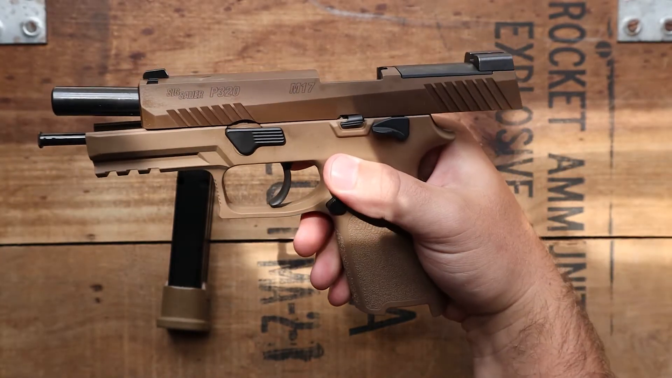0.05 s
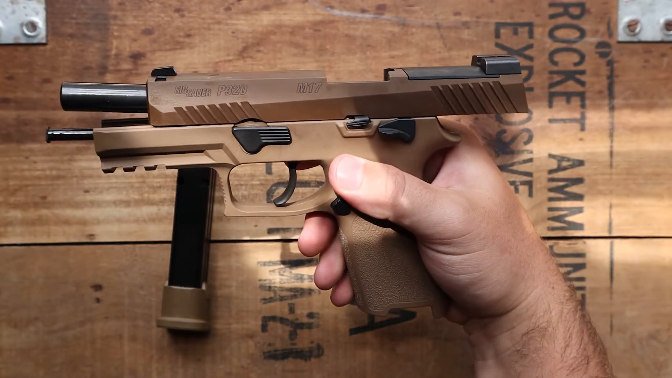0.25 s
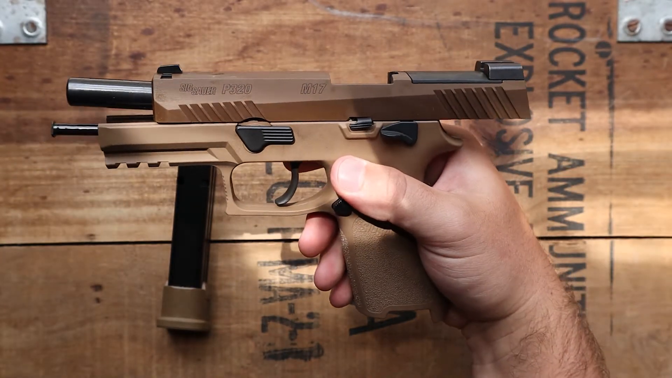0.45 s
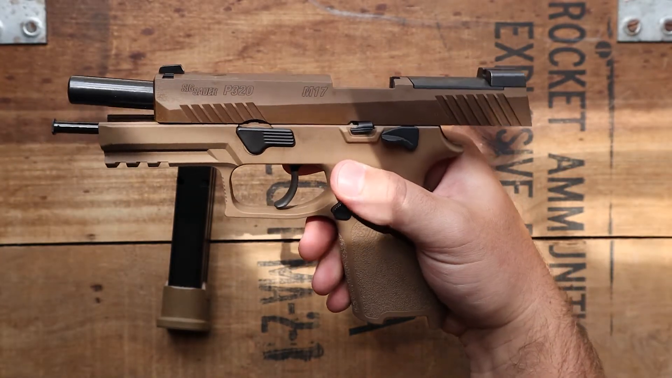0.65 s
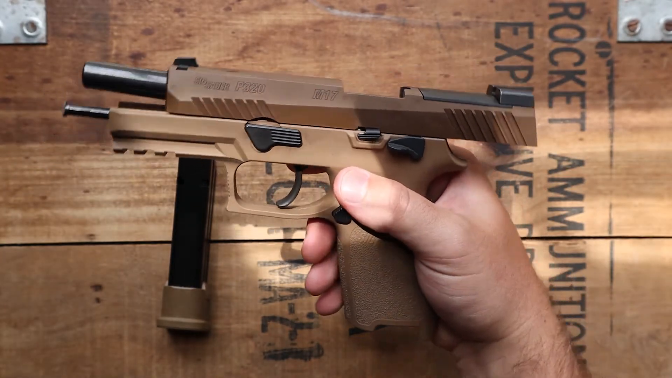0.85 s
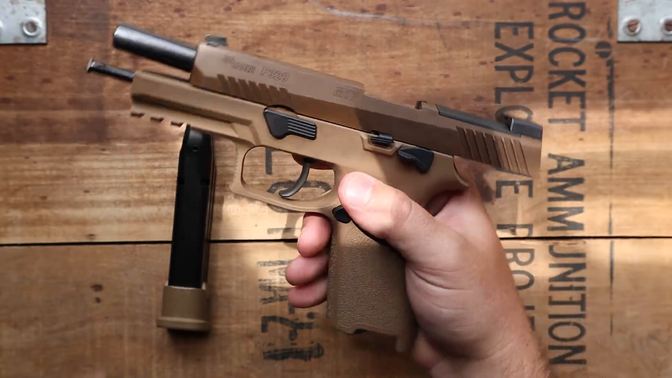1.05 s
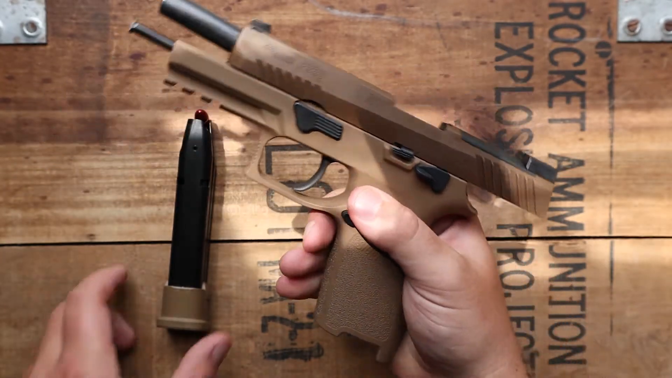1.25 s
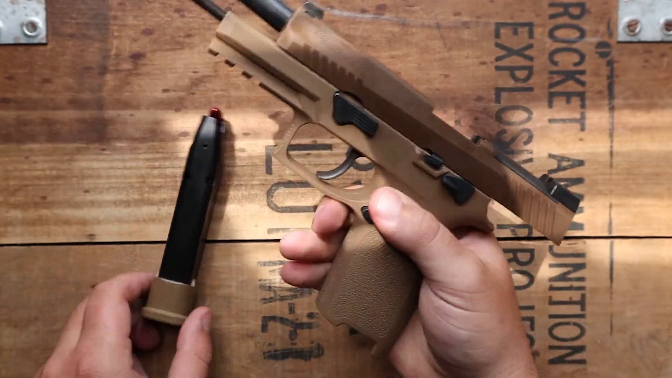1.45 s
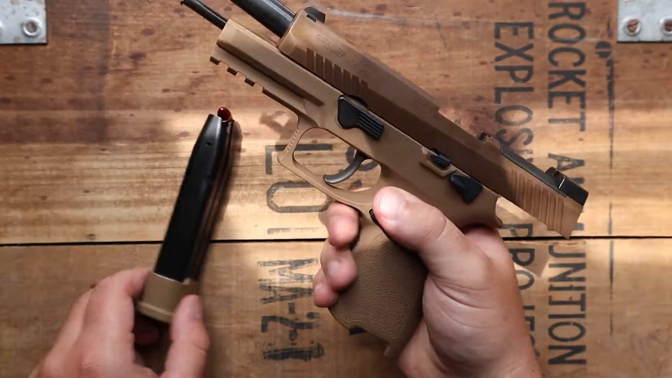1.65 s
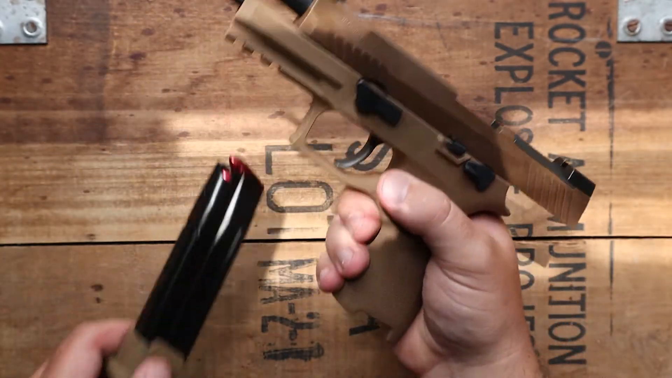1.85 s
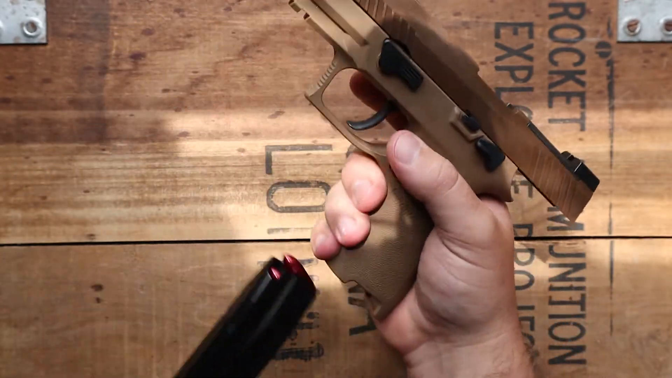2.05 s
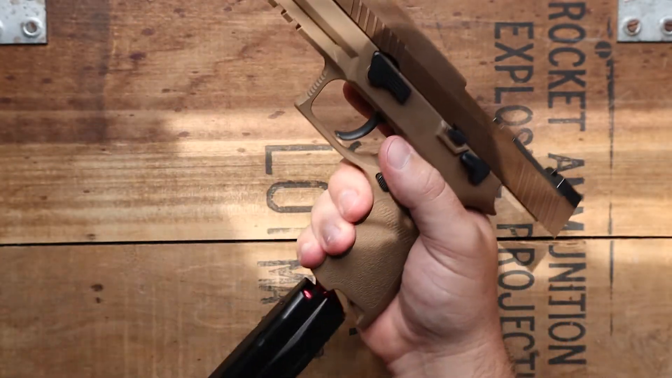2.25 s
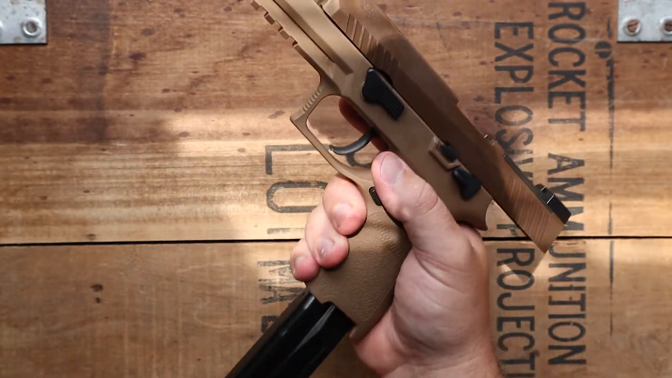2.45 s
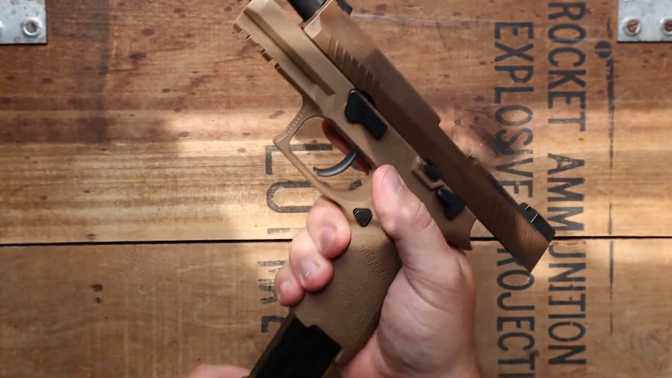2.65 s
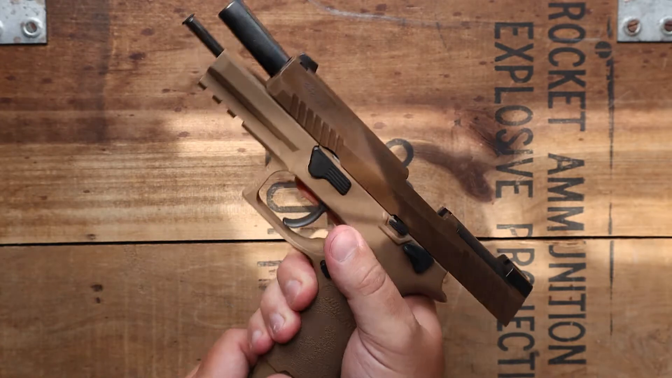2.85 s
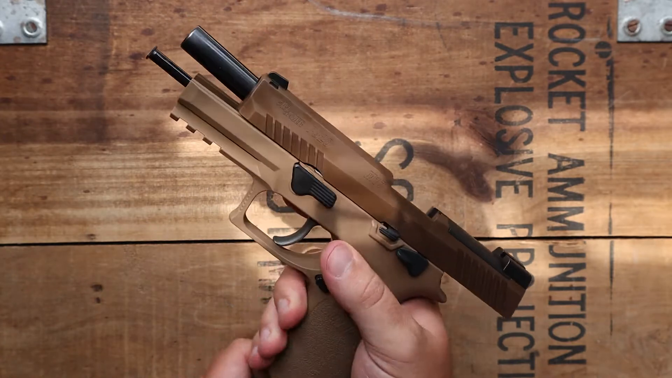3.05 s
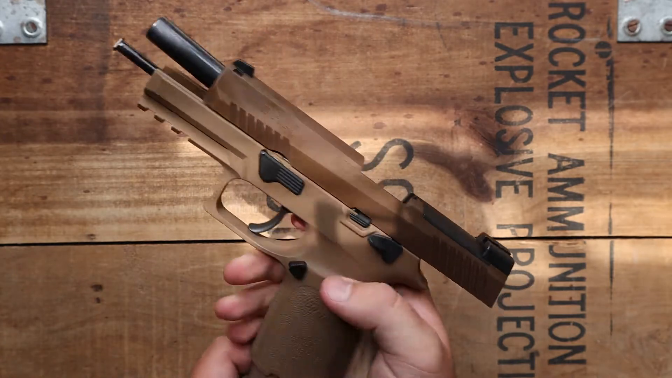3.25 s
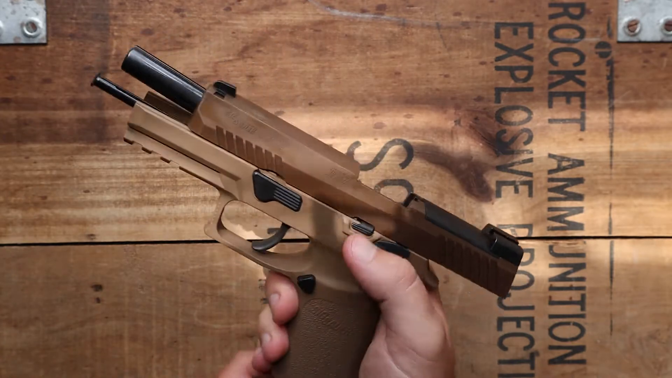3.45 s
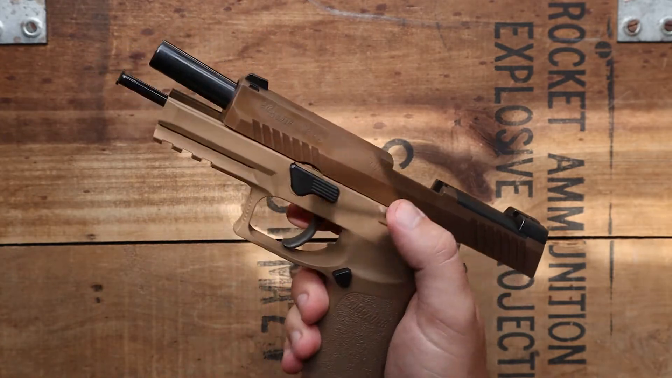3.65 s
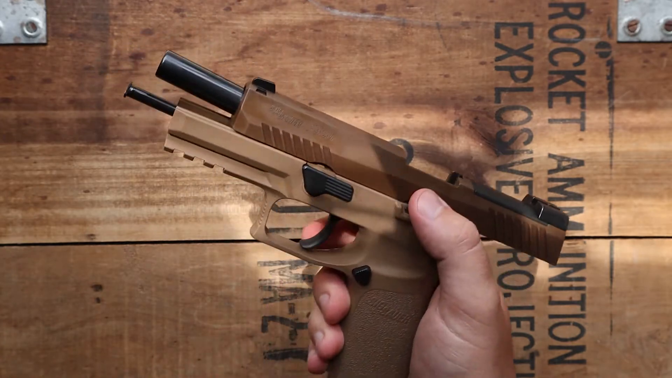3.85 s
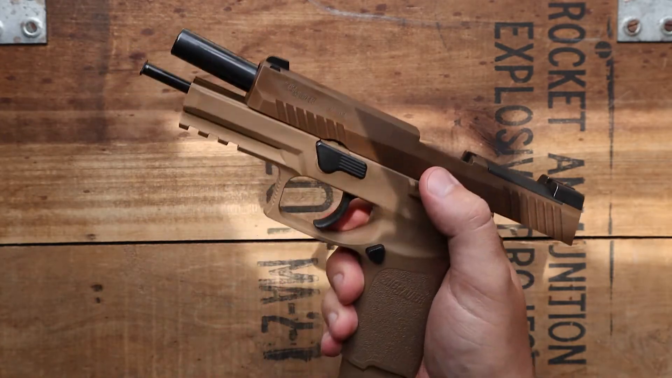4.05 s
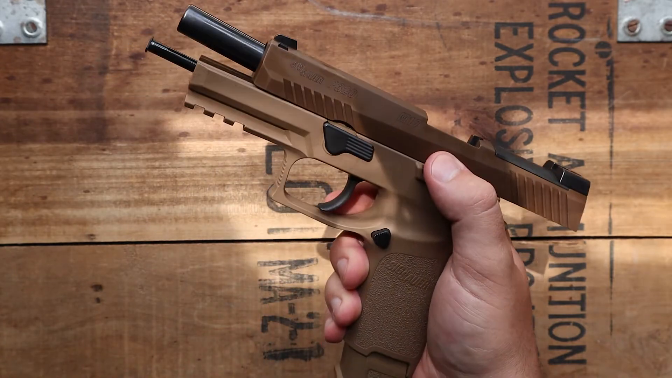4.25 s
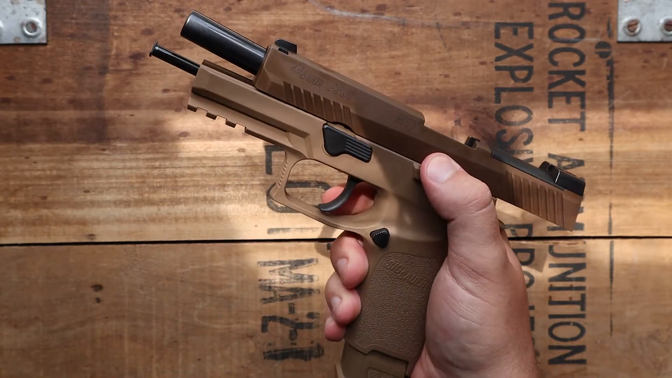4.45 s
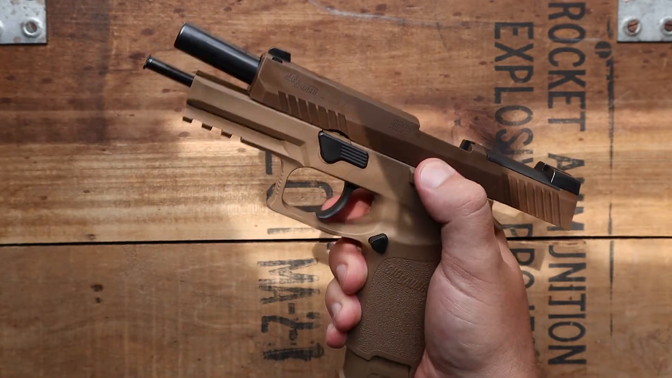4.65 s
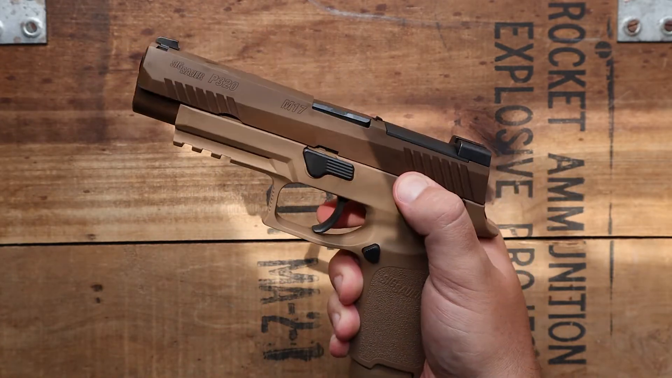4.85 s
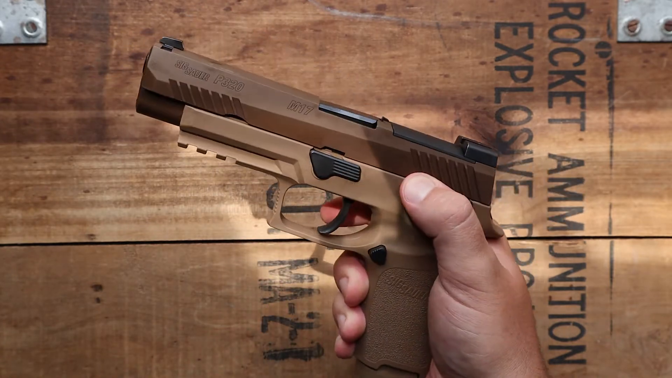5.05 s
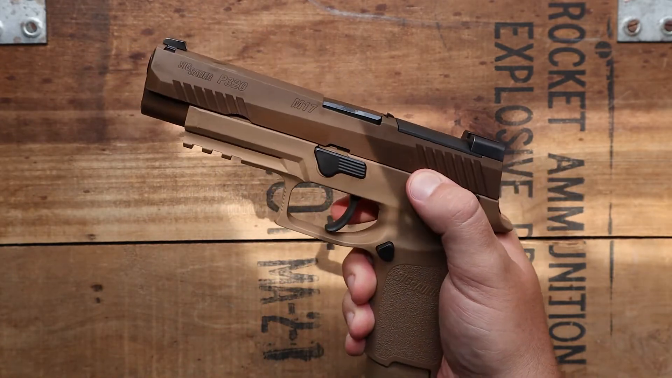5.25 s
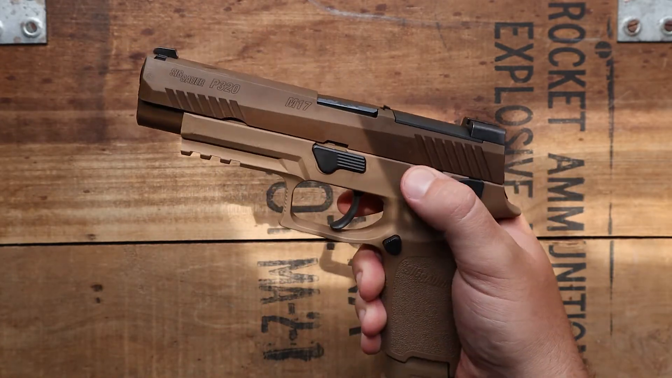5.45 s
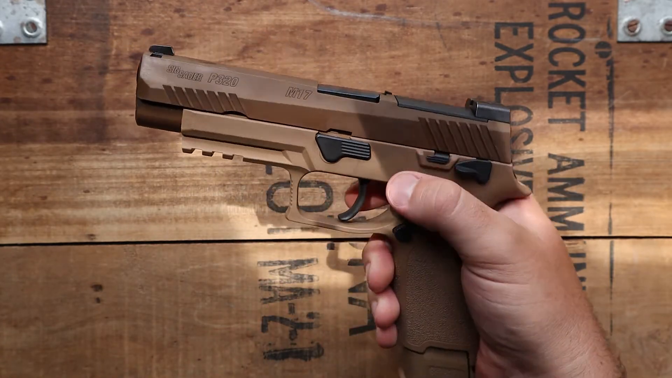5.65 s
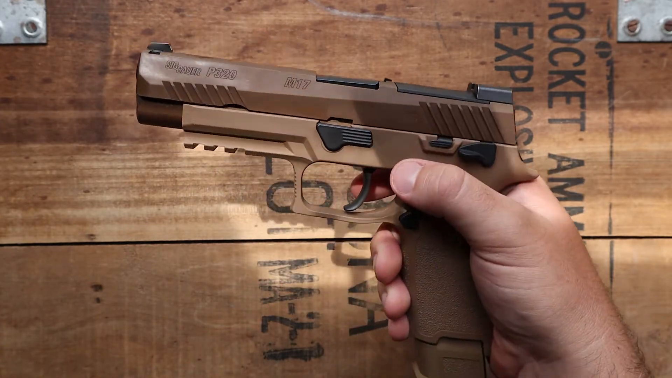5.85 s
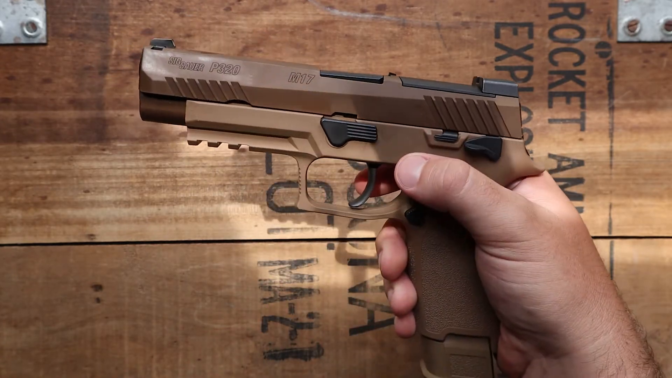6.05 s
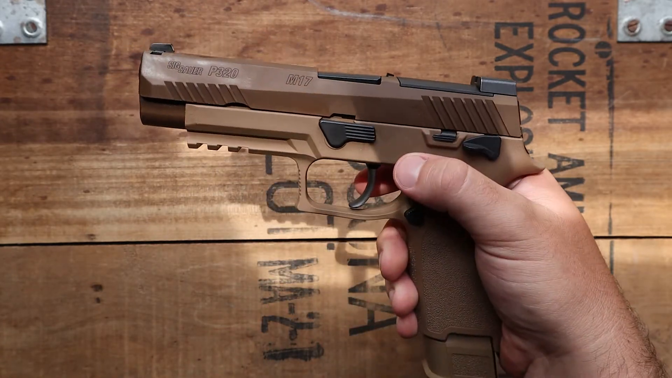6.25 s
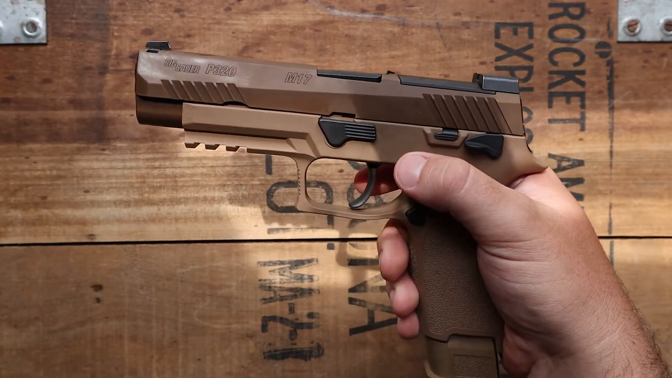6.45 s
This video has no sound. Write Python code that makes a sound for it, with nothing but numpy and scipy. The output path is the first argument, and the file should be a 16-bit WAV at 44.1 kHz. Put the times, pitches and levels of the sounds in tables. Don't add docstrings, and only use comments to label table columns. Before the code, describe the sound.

Very close in a small hard room with faint steady hiss, a hand shifts quietly on a pistol grip. A magazine knocks hollow wooden boards as it is picked up, ticks against the grip, scrapes upward and latches with a loud metallic clack. Small lever clicks follow, then a pause, and the slide slams forward with a bright crack, a brief rattle and a thin fading ring.

```python
import sys
import numpy as np
from scipy import signal
from scipy.fft import rfft, irfft
from scipy.io import wavfile
from scipy.ndimage import uniform_filter1d, minimum_filter1d

SR = 44100
rng = np.random.default_rng(int(sys.argv[2]) if len(sys.argv) > 2 else 0)


def decibels_to_gain(level_db):
    exponent = np.asarray(level_db, float) / 20
    return 10 ** exponent


def output_pcm(signal):
    pcm = np.clip(np.atleast_2d(signal).T, -1, 1) * 32767
    wavfile.write(sys.argv[1], SR, np.round(pcm).astype(np.int16))


N = 286723


def colour(x, points):
    hz, db = np.transpose(points)
    f = np.fft.rfftfreq(len(x), 1 / SR) + 1
    y = irfft(rfft(x) * decibels_to_gain(np.interp(np.log(f), np.log(hz), db)), len(x))
    return y / np.sqrt(np.mean(y ** 2))


def decay(t, t60):
    return 1000. ** (-t / t60)


def ring(push, modes):
    t = np.arange(len(push)) / SR
    body = sum(decibels_to_gain(db) * np.sin(2 * np.pi * hz * t) * decay(t, max(t60, .003)) for hz, db, t60 in modes)
    return signal.fftconvolve(push, body)[:len(t)]


def add(out, s, x, peak_db):
    i = int(s * SR)
    x = x[:N - i]
    out[i:i + len(x)] += x * decibels_to_gain(peak_db) / np.max(np.abs(x))


def walk(rate):
    k = int(SR / rate)
    held = np.repeat(rng.standard_normal(N // k + 1), k)
    return 1.2 * uniform_filter1d(held, k)[:N]


def air():
    # frequency in Hz, density in dB per Hz
    hiss_points = [(60, -49.5), (193, -30), (515, -7), (732, -5.5), (1250, -6), (4120, -18), (10000, -25),
                   (15500, -22.5)]
    # frequency in Hz, width in Hz, level in dB
    duct_mode = (683, 23, -73.5)
    hz, width, db = duct_mode
    duct_points = [(hz - 3 * width, -60), (hz - width / 2, -3), (hz, 0),
                   (hz + width / 2, -3), (hz + 3 * width, -60)]
    duct = colour(rng.standard_normal(N), duct_points)
    hiss = colour(rng.standard_normal(N), hiss_points)
    return decibels_to_gain(-62.5 + .3 * walk(3)) * hiss + decibels_to_gain(db + 0.82 * walk(1.6)) * duct


def room(x):
    # band centre in Hz, level in dB
    bands = [(450, -24), (900, -0.5), (1600, 3.5), (2600, 2.5), (4200, 2), (7000, 3), (11000, -2),
             (14800, -3.5)]
    band_t60 = [.15, .31, .39, .39, .385, .37, .32, .29]
    onset_s = 0.0065
    t, reply = np.arange(SR // 2) / SR, 0
    for (hz, db), t60 in zip(bands, band_t60):
        edges = [(hz / 1.6, -30), (hz / 1.2, 0), (hz * 1.2, 0), (hz * 1.6, -30)]
        band = colour(rng.standard_normal(len(t)), edges)
        reply = reply + decibels_to_gain(db) * np.sqrt(hz) * band * decay(t, t60)
    reply = reply * np.clip(t / onset_s, 0, 1) ** 2
    return signal.fftconvolve(x, reply / np.sqrt(np.sum(reply ** 2)))[:N]


def friction(low_points, grain_db, patchy_db):
    # frequency in Hz, density in dB per Hz
    high_points = [(2500, -28), (4500, 0.5), (7500, 5.5), (10000, -3), (15000, -7)]
    size_db = grain_db * np.minimum(rng.exponential(size=N), 3.5)
    slips = rng.standard_normal(N) * decibels_to_gain(size_db)
    return decibels_to_gain(patchy_db * walk(90)) * [colour(slips, high_points), colour(slips, low_points)]


def rubs():
    # peak in seconds, rise in seconds, fall in seconds, level above 3.5 kHz in dB,
    # lower part relative to it in dB
    shifts = [
        (.158, 0.011, 0.041, -62, -10),
        (.8, 0.13, 0.058, -67.5, -4),
        (1.486, 0.047, 0.094, -61, 3.5),
        (1.745, 0.036, 0.052, -64, 4),
        (3.275, .06, 0.073, -66, -1.5),
        (3.55, 0.039, .06, -62.5, 7),
        (4.101, .05, 0.032, -64.5, -14),
        (6.335, .07, 0.066, -71, -7),
    ]
    # frequency in Hz, density in dB per Hz
    low_points = [(500, -6), (900, 14), (2500, 20.5), (3500, 11), (5000, -32)]
    fade_db = 16.5
    t = np.arange(N) / SR
    high, low = friction(low_points, grain_db=3.5, patchy_db=2.0)
    out = np.zeros(N)
    for s, rise, fall, db, low_db in shifts:
        away = np.maximum((s - t) / rise, (t - s) / fall)
        out += decibels_to_gain(db - fade_db * away ** 1.4) * (high + decibels_to_gain(low_db) * low)
    return out


def crate():
    # start in seconds, peak in dB, brightness in dB per octave,
    # boom of the lowest boards in dB
    knocks = [
        (1.46, -46, 1, 9),
        (1.517, -34.5, 6, -1),
        (1.557, -31.5, 6.5, 13),
        (1.724, -43.5, -10, -18),
        (1.737, -37.5, 9, 1),
        (1.747, -38.5, 2, -3),
        (1.762, -35.5, 10.5, -8),
        (1.77, -41.5, 9, -12),
        (1.784, -46, -1, -12),
    ]
    # frequency in Hz, level in dB, t60 in seconds
    boards = [(190, -34, 0.14), (256, -2, 0.18), (341, 3, 0.055), (438, -3.5, 0.13), (517, -2, 0.057),
              (587, 5, 0.063), (730, 8, 0.014), (810, -11, 0.055), (1000, -2, 0.016), (1180, -9, .03),
              (1810, -19, 0.043), (2600, -18, 0.0098)]
    out, t = np.zeros(N), np.arange(8192) / SR
    for s, peak_db, bright_db, boom_db in knocks:
        modes = []
        for (hz, db, t60), spot in zip(boards, rng.standard_normal(len(boards))):
            tilt_db = bright_db * np.log2(hz / 400) + boom_db * (hz < 300)
            modes.append((hz, db + tilt_db + 2.0 * spot, t60))
        blow = t / 0.00037 * np.exp(-t / 0.00021)
        scuff = 0.19 * rng.standard_normal(len(t)) * np.exp(-t / 0.012)
        add(out, s, ring(blow + scuff, modes), peak_db)
    thin_boards = signal.butter(2, 170, "high", fs=SR, output="sos")
    return signal.sosfilt(thin_boards, out)


def scrape():
    # time in seconds, level above 3.5 kHz in dB
    course = [
        (2.53, -85),
        (2.59, -69),
        (2.635, -58.5),
        (2.72, -58),
        (2.765, -61.5),
        (2.8, -51),
    ]
    # frequency in Hz, density in dB per Hz
    low_points = [(500, -29), (900, 3.5), (1600, -13), (2800, 1.5), (3800, -5), (5000, -10.5),
                  (7000, -23.5)]
    t = np.arange(N) / SR
    high, low = friction(low_points, grain_db=0.0, patchy_db=1.6)
    s, db = np.transpose(course)
    gate = np.clip(np.minimum(t - s[0], s[-1] - t) / 0.0083, 0, 1)
    return gate * decibels_to_gain(np.interp(t, s, db)) * (high + decibels_to_gain(8) * low)


def pings():
    # start in seconds, peak in dB
    nudges = [
        (3.107, -54),
        (3.1125, -57),
        (3.118, -55),
        (3.146, -51),
        (3.183, -62),
        (4.671, -58),
        (4.676, -51),
        (4.681, -52),
    ]
    # frequency in Hz, level in dB, t60 in seconds
    pin = [(4605, 0, .065), (6100, -5, .012), (8100, -8, .008), (9050, -8, .01), (3400, -10, .008)]
    out, t = np.zeros(N), np.arange(8192) / SR
    for s, peak_db in nudges:
        nudge = rng.standard_normal(len(t)) * (1 - np.exp(-t / 0.00041)) * np.exp(-t / 0.0009)
        add(out, s, ring(nudge, pin), peak_db)
    return out


def barrel():
    # start in seconds, frequency in Hz, peak in dB, t60 in seconds
    tones = [(4.795, 1766, -55.5, 4.8), (4.795, 1766.38, -56, 4.8), (4.795, 770, -63, 2.4),
             (4.794, 1710, -26, .26), (4.794, 1822, -26, .26), (4.797, 1580, -29, .28),
             (4.7935, 1755, -7, .035), (4.7605, 3330, -13, .04), (4.7612, 2480, -16, .04),
             (4.766, 3730, -16, .05), (4.765, 8160, -13, .03)]
    out, t = np.zeros(N), np.arange(2 * SR) / SR
    for s, hz, db, t60 in tones:
        tone = (1 - np.exp(-t / .0006)) * np.sin(2 * np.pi * hz * t) * decay(t, t60)
        add(out, s, tone, db)
    return signal.sosfilt(signal.butter(2, 600, "high", fs=SR, output="sos"), out)


def contacts(table, ring_db, t60, mid_db, spot_db, cycles, soft_hz, low_hz, top_hz, drag_s=0):
    # frequency in Hz, level in dB
    frame = [(900, -2.5), (1480, -29), (1950, -8.5), (2600, 7.5), (3350, 12.5), (4650, 3), (6200, -12.5),
             (7500, -11.5)]
    out, around, t = np.zeros(N), np.zeros(N), np.arange(2048) / SR
    edges = (low_hz, 2200, 5800, top_hz)
    bands = [signal.butter(3, edge, "band", fs=SR, output="sos") for edge in zip(edges, edges[1:])]
    droop = signal.butter(1, min(soft_hz, top_hz), fs=SR)
    for s, peak_db, hz, hard_db in table:
        length = 0.00051 + cycles / hz + drag_s
        grit = rng.standard_normal(len(t)) * (1 - np.exp(-t / 0.00016)) * np.exp(-t / length)
        grit = signal.lfilter(*droop, grit)

        modes = []
        for (f, db), (detune, scatter) in zip(frame, rng.standard_normal((len(frame), 2))):
            soft_db = min(hard_db, 0) * np.log2(max(f / hz, 1))
            modes.append((f * (1 + .03 * detune), db - 14 + 3.5 * scatter + soft_db, t60))

        slope = np.array([-hard_db, mid_db, hard_db], float)
        slope[np.searchsorted(edges[1:3], hz)] += 4.5
        for band, db in zip(bands, peak_db - 3.0 + slope - slope.max()):
            add(out, s, signal.sosfilt(band, grit), db)
            click = signal.sosfilt(band, t == 0)
            crest = np.max(click ** 2) / np.sum(click ** 2)
            add(around, s, click, db + 10 * np.log10(length * SR / 8 * crest))

        stiffness = signal.butter(2, max(0.52 * hz, 4000), fs=SR, output="sos")
        add(out, s, ring(signal.sosfilt(stiffness, grit), modes), peak_db - 4.0 + ring_db)
        spot_t60 = t60 * min(2500 / hz, 1)
        add(out, s, ring(grit, [(hz, 0, spot_t60)]), peak_db - 2.5 + spot_db)
    small_body = signal.butter(5, 480, "high", fs=SR, output="sos")
    return signal.sosfilt(small_body, [out, around])


def ticks():
    # start in seconds, peak in dB, ring in Hz,
    # hardness in dB per band
    touches = [(2.4812, -24, 857, -1), (2.4826, -28, 1990, -7), (2.4848, -23.5, 2000, -1.5),
               (2.524, -28, 1870, -5.5), (2.5273, -37, 2980, -6), (2.557, -39.5, 920, -12),
               (2.5765, -29.5, 1157, -12), (2.614, -39, 1000, -5.5), (2.647, -27, 1096, -5),
               (2.6478, -25.5, 3563, -7), (2.687, -42, 2400, -10), (2.774, -33.5, 2960, -6),
               (2.782, -30, 945, -10.5), (2.789, -17.5, 2188, -3.5), (2.796, -19.5, 1465, -4),
               (2.802, -17, 3386, -3.5), (2.8131, -16, 1705, -4), (2.817, -15, 1520, -6.5),
               (2.8473, -10.5, 660, -16), (2.922, -31.5, 3380, -5.5), (2.9292, -25, 1910, -12),
               (2.9972, -29, 3440, -4), (2.9982, -20, 4870, -2), (2.9991, -29, 2100, 0),
              (3.037, -28, 1580, -16), (3.4971, -53, 6570, 2.5), (3.5156, -37.5, 4330, 4),
              (3.5168, -31, 2440, 20), (3.5402, -36, 6400, -3), (3.538, -48, 1100, -3),
              (3.545, -27, 2750, 4), (3.565, -47, 4480, -4), (3.575, -35.5, 1310, -1),
              (4.6594, -39, 12500, 0.5), (4.66, -34.5, 1910, 2), (4.6619, -32.5, 3140, -1.5),
              (5.5491, -49.5, 3970, 9)]
    return contacts(touches, ring_db=-2.5, t60=.013, mid_db=7.5, spot_db=-2, cycles=0.6,
                    soft_hz=5060, low_hz=567, top_hz=15000)


def rattle():
    # start in seconds, length in seconds, first peak in dB, last peak in dB
    spells = [
        (2.859, .06, -28, -37.5),
        (4.77, .023, -6, -6),
        (4.792, .062, -12.5, -25.5),
    ]
    per_s, scatter_db = 190, 5
    low_hz, high_hz, hard_db = 3570, 9030, 10
    rows = []
    for s, length, first_db, last_db in spells:
        count = round(length * per_s)
        for k, (late, spot, size) in enumerate(rng.random((16, 3))[:count]):
            at = (k + late) / count
            hz = low_hz * (high_hz / low_hz) ** spot
            peak_db = first_db + at * (last_db - first_db) + scatter_db * (2 * size - 1)
            rows.append((s + at * length, peak_db, hz, hard_db))
    return rows


def steel_blows():
    # start in seconds, peak in dB, ring in Hz, hardness in dB per band
    blows = [
        (2.809, -8.5, 8800, 0),
        (2.843, -14, 4000, 4),
        (2.8462, -1, 9760, 3),
        (2.8485, -5.5, 3300, -1.5),
        (2.849, -6, 2000, 4),
        (2.886, -24.5, 2500, 1.5),
        (4.7585, -3, 3454, -0.5),
        (4.7605, -5.5, 3343, 3.5),
        (4.765, 1.5, 8190, 2.5),
        (4.7935, -10.5, 4200, -1),
    ]
    steel = dict(t60=.022, mid_db=2.5, spot_db=-7, cycles=13, soft_hz=14900, top_hz=14600)
    struck = contacts(blows, ring_db=-8, low_hz=1000, **steel)
    return struck + contacts(rattle(), ring_db=-7.5, low_hz=1400, drag_s=0.013, **steel)


def scene():
    metal, metal_around = steel_blows()
    small, small_around = ticks()
    wood = crate()
    wet = room(decibels_to_gain(-6.5) * metal_around + decibels_to_gain(-11.5) * small_around + decibels_to_gain(-5) * wood)
    return (metal + small + pings() + wood + rubs() + scrape() + barrel() + wet + air())[None]


def roll_off(x):
    return signal.sosfilt(signal.butter(12, 16730, fs=SR, output="sos"), x)


def record(dry):
    limit, hold = .62, int(.0015 * SR)
    squeeze = np.minimum(limit / (np.abs(dry) + 1e-9), 1) ** .85
    x = dry * uniform_filter1d(minimum_filter1d(squeeze, hold), hold)
    x = signal.sosfilt(signal.butter(8, 190, "high", fs=SR, output="sos"), x)
    x = signal.sosfilt(signal.cheby1(8, .2, 15800, fs=SR, output="sos"), x)
    return roll_off(x)


dry = scene()
out = record(dry)
output_pcm(out)
```